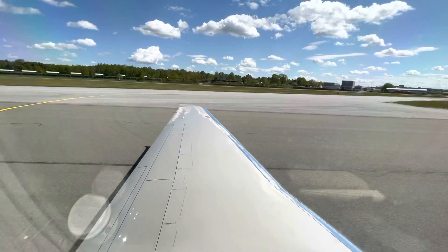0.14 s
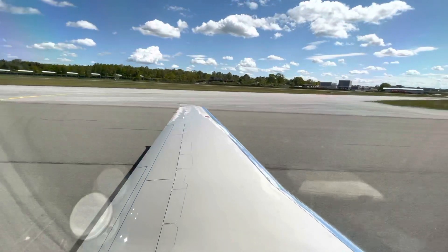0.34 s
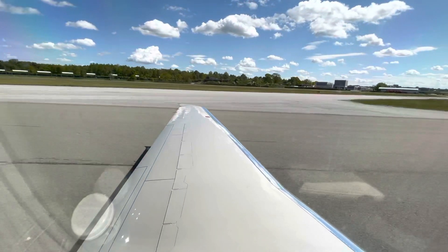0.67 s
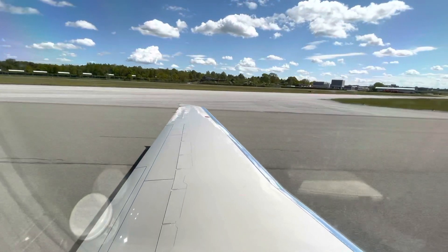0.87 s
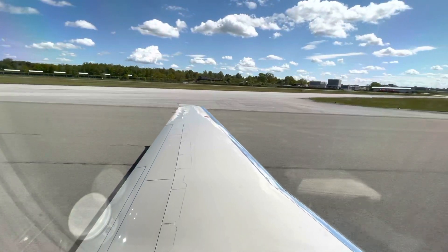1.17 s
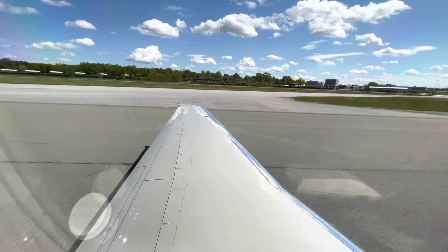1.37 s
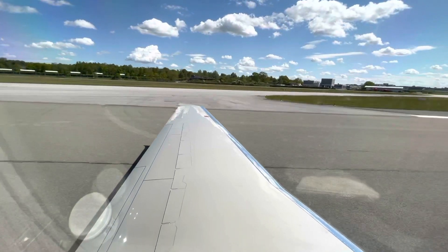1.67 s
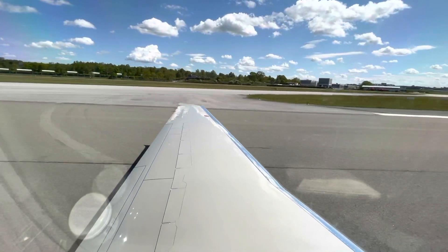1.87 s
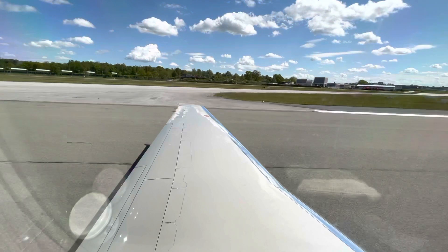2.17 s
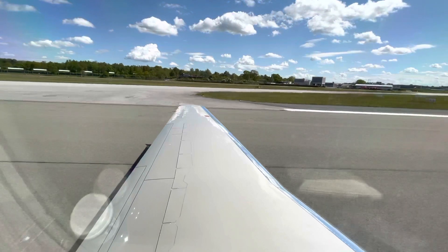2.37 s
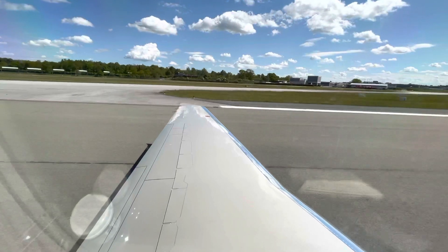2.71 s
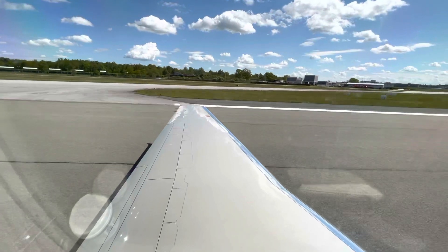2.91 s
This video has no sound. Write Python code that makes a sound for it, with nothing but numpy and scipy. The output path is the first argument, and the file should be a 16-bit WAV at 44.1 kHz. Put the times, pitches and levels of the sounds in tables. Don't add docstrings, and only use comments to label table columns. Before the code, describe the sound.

A small jet rolls along a runway, heard in stereo inside the cabin. Deep rumble, wavering low boom and steady fan and pump hum last all 3 seconds, with gentle wheel-shake swells near 0.2, 1.0 and 1.5. Faint beating engine whines sink slightly over drone and soft hiss. Small dry ticks, mostly left, fall near 0.13, 0.86, 1.45, 2.48 and very faintly 2.76; a tiny squeak at 2.27.

```python
import sys
import numpy as np
from scipy import signal
from scipy.fft import rfft, irfft, next_fast_len
from scipy.io import wavfile
from scipy.ndimage import uniform_filter1d, map_coordinates

SR = 44100
rng = np.random.default_rng(int(sys.argv[2]) if len(sys.argv) > 2 else 0)


def makeup_ratio(level_db):
    decades = np.asarray(level_db, float) / 20
    return 10 ** decades


def dump_mix(stems):
    frames = np.atleast_2d(stems).T
    limited = np.clip(frames, -1, 1)
    pcm = np.round(limited * 32767).astype(np.int16)
    wavfile.write(sys.argv[1], SR, pcm)


N = 134505

# f/Hz, likeness (0 to 1)
CORE_ALIKE = [(400, 0.099), (1000, 0.25), (1800, 0.91), (2500, .55), (3200, .2)]
# t/s, gearbox level/dB, bearing level/dB, turbine level/dB
SWELL = [(0, 4.5, 6, 6), (.25, 4, 5, -1), (.5, -0.5, -1, 2), (.8, 6, 3, 6), (1.1, -8, -1, 3),
         (1.3, 3, 2, -6.5), (1.7, -2, 4, -7), (2.05, 4.5, -1, 1), (2.45, -0.5, -2, 0), (2.75, 2, -4, 2),
         (3.05, -9, 6, -4)]
PORT_LEAD_S = 0.00041
WHINE_WIDTH_HZ = 0.89
FITTING_LEFT_DB = 9


def unit(x):
    return x / np.sqrt(np.mean(x ** 2) + 1e-20)


def along(points, hz, closed=None):
    f, v = np.transpose(points)
    return np.interp(np.log(hz + 1), np.log(f + 1), v, closed, closed)


def curve(rows):
    s, v = np.transpose(rows)
    return np.interp(np.arange(N) / SR, s, v)


def wobble(rate):
    coarse = np.arange(0, N + 32, 32)
    knots = map_coordinates(rng.standard_normal(1000), [coarse * min(rate, 250) / SR])
    return np.interp(np.arange(N), coarse, knots)


def filtered(x, response):
    m = next_fast_len(N + 8192)
    return irfft(rfft(x, m) * response(np.fft.rfftfreq(m, 1 / SR)), m)[..., :N]


def bumps(hz, rows):
    return sum(db * np.exp(-((hz - centre) / width) ** 2) for centre, width, db in rows)


def wall(hz):
    wall_hz = [356, 590, 680, 765, 900, 1240, 4500, 8450]
    # width/Hz, level/dB
    wall_rows = [(9, 3), (45, -8.5), (24.8, 2), (17.9, -1.5), (70, -2), (40, 1.5), (250, 5), (200, -3.5)]
    return makeup_ratio(bumps(hz, [(centre, *row) for centre, row in zip(wall_hz, wall_rows)]))


def pane(hz):
    pane_hz = [3143, 4230, 5325, 9050, 9540]
    # width/Hz, level/dB
    pane_rows = [(16, 7), (30, 2), (50, 3.5), (45, 8.5), (50, 0)]
    return makeup_ratio(bumps(hz, [(centre, *row) for centre, row in zip(pane_hz, pane_rows)]))


def colour(points):
    # f/Hz, width/Hz, level/dB
    cabin = [(43.6, 3.9, 8), (132.6, 5.2, 3.5), (158, 16, 1), (221.3, 8.9, 4), (262.4, 7, 7),
             (320.4, 16, -3), (348.6, 11, 3.5), (595, 16, 5.5), (721, 13, 2), (760, 4.9, 2)]
    return lambda hz: makeup_ratio(along(points, hz, closed=-120) + bumps(hz, cabin))


def rush(gain, alike, lead_s, patchy_db):
    # f/Hz, left over right level/dB
    left_over_right = [(60, 0), (130, 0), (290, 9.5), (450, 0.5), (1000, 3), (2500, 4), (5500, 14),
                       (8800, 4)]
    z = signal.stft(rng.standard_normal((2, N)), nperseg=512)[2]
    field = uniform_filter1d(rng.standard_normal(z.shape[1:]), size=5, axis=0)
    field = uniform_filter1d(field, size=12, axis=1)
    common, own = signal.istft(z * makeup_ratio(patchy_db * unit(field)), nperseg=512)[1][:, :N]
    share = lambda hz: np.clip(along(alike, hz), 0, 1)
    far = lambda hz: gain(hz) * wall(hz) * makeup_ratio(-along(left_over_right, hz))
    left = filtered(common, gain)
    right = filtered(common, lambda hz: far(hz) * share(hz) * np.exp(-2j * np.pi * hz * lead_s))
    right = right + filtered(own, lambda hz: far(hz) * np.sqrt(1 - share(hz) ** 2))
    return np.array([left, right]) / np.sqrt(np.mean(left ** 2))


def tone(hz, width_hz, left_db, over_db, lead, sway_db, sway_rate=9):
    phase = 2 * np.pi * np.cumsum(hz + width_hz * wobble(40 + 2 * width_hz)) / SR
    shared = wobble(sway_rate)
    separate = np.array([wobble(sway_rate), wobble(sway_rate)])
    sway = sway_db * (shared + 0.16 * separate)
    level = np.sqrt(2) * makeup_ratio(left_db + sway - [[0], [over_db]])
    return level * np.sin(phase - [[0], [lead]])


def hull():
    # f/Hz, level per Hz/dB
    rumble_points = [(15, -32.5), (25, -21), (54, -4.5), (71, -2.5), (158, -1), (302, -12), (336, -13),
                     (387, -21.5), (420, -23.5), (550, -44), (920, -120)]
    # f/Hz, likeness (0 to 1)
    hull_alike = [(60, 0.95), (130, 0.89), (270, 0.85), (400, 1)]
    # t/s, level/dB
    heave = [(0, 0.5), (.2, -0.5), (.8, -0.5), (.97, 0.5), (1.25, -0.5), (1.65, -1), (1.9, -2), (2.2, 0),
             (2.6, -1.5), (3.05, 0)]
    # t/s, f/Hz, level/dB
    boom_rows = [(0.0, 68.19, -19), (0.37, 66.6, -18), (1.51, 67.38, -21), (1.77, 74.35, -18),
                 (2.26, 68.92, -29.5), (2.41, 71.4, -24), (2.53, 67.1, -16.5), (2.66, 65.9, -24),
                 (2.93, 66.63, -16.5), (3.05, 67.4, -25)]
    rumble = makeup_ratio(-14 + curve(heave)) * rush(colour(rumble_points), hull_alike, lead_s=.0001, patchy_db=0.4)
    boom_hz = curve(np.array(boom_rows)[:, [0, 1]])
    boom_db = curve(np.array(boom_rows)[:, [0, 2]]) - 0.5
    boom = tone(boom_hz, 2, boom_db, 0.81, -0.055, sway_db=2.5)
    return rumble + boom


def wheels():
    # t/s, level/dB
    rolling = [(0, -26), (.14, -26.5), (.18, -30), (.3, -26.5), (.37, -32.5), (.65, -30), (.93, -33.5),
               (.98, -24.5), (1.09, -26.5), (1.16, -33.5), (1.41, -31.5), (1.46, -26), (1.61, -34),
               (1.86, -31), (2.04, -34), (2.18, -29), (2.23, -32.5), (3.05, -31)]
    # f/Hz, level per Hz/dB
    trim = [(300, -39.5), (450, -6.5), (640, -2), (800, -6.5), (1100, -13.5), (1600, -16), (2200, -39.5)]
    swell = makeup_ratio(curve(rolling) + 6 + 0.32 * wobble(9.55))
    return swell * rush(colour(trim), CORE_ALIKE, PORT_LEAD_S, patchy_db=2.0)


def core_drone():
    # f/Hz, level per Hz/dB
    drone = [(180, -32), (300, -8), (342, -4.5), (414, -14), (826, -30), (914, -9.5), (1150, -25),
             (2300, -28), (3300, -43.5), (4290, -82), (7260, -120)]
    return makeup_ratio(-30) * rush(colour(drone), CORE_ALIKE, PORT_LEAD_S, patchy_db=1.6)


def air_hiss():
    # f/Hz, level per Hz/dB
    hiss = [(2600, -9), (3600, 2), (4500, -8.5), (5200, -2.5), (8400, -10), (8750, -10), (9800, -8),
            (11300, -14.5)]
    # f/Hz, likeness (0 to 1)
    air_alike = [(3500, 0.46), (7500, 0.053), (8800, .8), (10000, .9)]
    return makeup_ratio(-47.5 + 0.38 * wobble(2.25)) * rush(colour(hiss), air_alike, lead_s=0.000236, patchy_db=1.7)


def gearbox():
    # t/s, f/Hz
    gear_hz = [(0, 2254), (1.5, 2247), (3.05, 2242)]
    gear_db = -53 + curve(np.array(SWELL)[:, [0, 1]])
    return tone(curve(gear_hz), WHINE_WIDTH_HZ, gear_db, 5, 0.77, sway_db=2.0, sway_rate=6.1)


def whine(spool, orders, rows, swells):
    total = 0
    for k, (db, over_db, lead) in zip(orders, rows):
        level_db = db + swells.get(k, 0)
        sway_db = 0.4 * abs(k - .6)
        total = total + tone(k * curve(spool), k * WHINE_WIDTH_HZ, level_db, over_db, lead, sway_db, sway_rate=4)
    return total


def near_engine():
    # t/s, f/Hz
    spool = [(0, 3168.7), (.76, 3149.8), (1.52, 3138.5), (2.4, 3127), (3.05, 3122.5)]
    orders = [1, 1.2766, 1.3404, 1.6172, 1.6596, 1.6811, 1.7081, 2, 2.1919, 2.6808, 2.8933, 3, 3.021]
    # left level/dB, left over right level/dB, left lead/rad
    rows = [(-58, 3.5, 1.2), (-62, 14.5, -0.9), (-64, 10.5, 1.4), (-63, 8, -1), (-67, 12.5, -0.5),
            (-68.5, 8.5, -2), (-74.5, 5.5, 2), (-78.5, 5.5, -1), (-70.5, 12, 3.5), (-74.5, 5.5, 3.3),
            (-71.5, -1, -1.5), (-80, -1.5, -3.5), (-66, -5, -3.5)]
    # t/s, level/dB
    fan = [(0, -3), (.12, 2), (.45, 1.5), (.7, 1), (1.7, 0), (2.4, 0), (3.05, -1)]
    # t/s, level/dB
    shaft = [(0, -7), (.4, -5), (.75, -11), (.9, 0), (1.6, 0.5), (3.05, -0.5)]
    # t/s, level/dB
    pump = [(0, 1), (1.5, 2.5), (1.95, -9), (2.3, -1), (2.55, 0), (3.05, -1.5)]
    # t/s, level/dB
    vane = [(0, -3), (.45, -3), (.8, -5.5), (1.8, -10), (2, 0), (3.05, -2)]
    # t/s, level/dB
    seal = [(0, 9), (.45, 4.5), (.7, -3.5), (3.05, -6)]
    swells = {1: curve(fan), 1.2766: curve(shaft), 1.3404: curve(pump), 1.6172: curve(vane), 1.6596: curve(seal)}
    swells[1.6811] = curve(np.array(SWELL)[:, [0, 2]])
    swells[2.8933] = curve(np.array(SWELL)[:, [0, 3]])
    return whine(spool, orders, rows, swells)


def far_engine():
    # t/s, f/Hz
    spool = [(0, 3176.5), (.76, 3162), (1.52, 3153), (2.29, 3145.5), (3.05, 3141.5)]
    orders = [.708, 1, 1.3404, 1.6169, 3.0214]
    # left level/dB, left over right level/dB, left lead/rad
    rows = [(-56, -2.5, 2.15), (-65, 1.5, -0.5), (-77, -1, 4.5), (-71.5, 4, -2), (-70.5, 1, -4.5)]
    # t/s, level/dB
    fan = [(0, 0), (.12, 4), (.45, 1), (.8, -0.5), (2.4, -0.5), (3.05, -2)]
    return whine(spool, orders, rows, {1: curve(fan)})


def engines():
    through_window = air_hiss() + gearbox() + near_engine() + far_engine()
    return core_drone() + filtered(through_window, pane)


def machines():
    hum_hz = [333.8, 909.3, 1069, 1237, 1399.5, 1543, 1817.5, 1998, 2399, 2663, 2672, 3521, 8001, 9600,
              10668]
    # width/Hz, left level/dB, left over right level/dB, left lead/rad
    hum_rows = [(0.85, -22, 10.5, 1.7), (1, -36.5, 13, -1), (5.24, -47, 1, 1.9), (8.18, -45.5, 3.5, -2.5),
                (7, -45.5, 12, -1.5), (8, -54, -1.5, 2), (2, -52.5, 4.5, -3), (23, -56, -3.5, -1.2),
                (3, -63, -3, 2), (1, -60.5, 4, 2), (1.2, -66, -1.5, 1.5), (8.6, -65.5, 5.5, 1),
                (2.5, -77.5, 6, 5.7), (5.7, -79.5, 10, -13), (3, -73.5, 0.5, -1.5)]
    return sum(tone(hz, *row, sway_db=-0.16) for hz, row in zip(hum_hz, hum_rows))


def patches():
    # t/s, f/Hz, half width/Hz
    scraps = [(.097, 10700, 150), (.119, 11600, 70), (.306, 10000, 200), (.493, 10200, 130),
              (.493, 9780, 90), (.595, 10700, 280), (.635, 10600, 170), (.84, 10650, 110),
              (.862, 10450, 800), (1.305, 10650, 80), (1.465, 11200, 110), (2.025, 10520, 200),
              (2.467, 10550, 250)]
    noise, t = rng.standard_normal(N), np.arange(N) / SR
    total = 0
    for s, hz, width in scraps:
        band = unit(filtered(noise, lambda f: np.abs(f - hz) < width))
        total = total + makeup_ratio(-71) * np.exp(-((t - s) / .012) ** 4) * band
    return total


def fitting():
    # t/s, peak level/dB
    ticks = [
        (0.1268, -34.5),
        (0.8577, -34.5),
        (1.4521, -35.5),
        (2.4768, -36.5),
        (2.759, -46),
    ]
    # f/Hz, level per Hz/dB
    crack_points = [(4800, -27.5), (5600, -3), (6600, -3), (7600, -4), (8700, 0), (9300, -9), (12500, -22)]
    # f/Hz, level per Hz/dB
    rattle_points = [(3000, -20), (3700, -1), (4300, -6), (4950, 0), (5600, -7), (7500, -10), (9100, -14),
                     (10500, -22)]
    crack_hold_s, crack_t60_s = .003, .008
    rattle_rise_s, rattle_t60_s = .002, .065
    t = np.arange(SR // 10) / SR
    crack, rattle = np.zeros(N + SR), np.zeros(N + SR)
    for s, db in ticks:
        start = round(s * SR)
        crack[start:][:len(t)] += makeup_ratio(db - 5.5 - 60 * np.maximum(t - crack_hold_s, 0) / crack_t60_s)
        rise = 1 - np.exp(-t / rattle_rise_s)
        rattle[start:][:len(t)] += makeup_ratio(db - 8.5 - 60 * t / rattle_t60_s) * rise
    sharp = unit(filtered(rng.standard_normal((2, N)), colour(crack_points)))
    dull = unit(filtered(rng.standard_normal((2, N)), colour(rattle_points)))
    balance = makeup_ratio([[FITTING_LEFT_DB / 2], [-FITTING_LEFT_DB / 2]])
    return (sharp * crack[:N] + dull * rattle[:N]) * balance


def squeak():
    centre_s, length_s = 2.272, 0.016
    centre_hz, width_hz = 7970, 470
    rub = unit(filtered(rng.standard_normal((2, N)), lambda hz: np.exp(-((hz - centre_hz) / width_hz) ** 2)))
    swell = np.exp(-((np.arange(N) / SR - centre_s) / length_s) ** 2)
    return rub * makeup_ratio([[-50], [-50 - FITTING_LEFT_DB]]) * swell


def scene():
    return hull() + wheels() + engines() + machines() + fitting() + squeak()


def low_pass(x):
    return signal.sosfilt(signal.butter(12, 11800, fs=SR, output="sos"), x)


def record(dry):
    # f/Hz, level/dB
    mid_points = [(9200, 0), (9350, -3), (9640, -3), (9660, -60)]
    # f/Hz, level/dB
    side_points = [(8500, 0), (8780, -4), (9000, 0), (10850, 0), (11000, -8), (11150, -60)]
    ceiling, knee = 1.1, 4
    dry = dry / (1 + np.abs(dry / ceiling) ** knee) ** (1 / knee)
    mid = filtered((dry[0] + dry[1]) / 2, lambda hz: makeup_ratio(along(mid_points, hz))) + patches()
    side = filtered((dry[0] - dry[1]) / 2, lambda hz: makeup_ratio(along(side_points, hz)))
    return low_pass(np.array([mid + side, mid - side]))


dry = scene()
out = record(dry)
dump_mix(out)
```